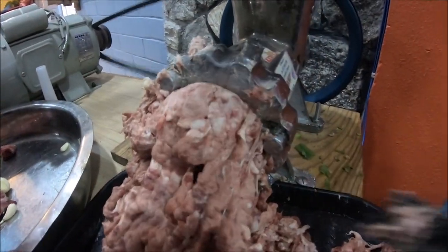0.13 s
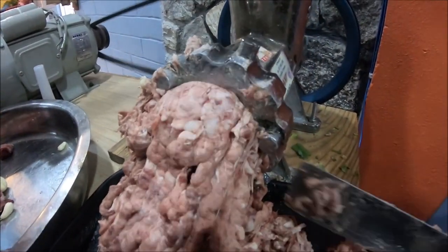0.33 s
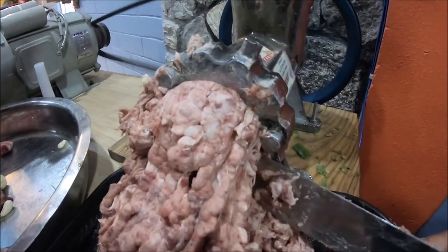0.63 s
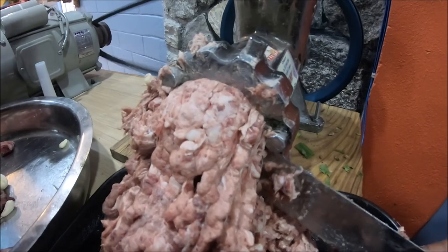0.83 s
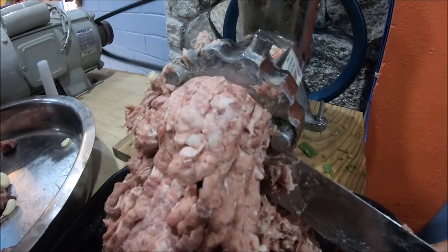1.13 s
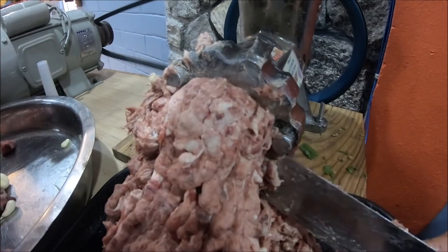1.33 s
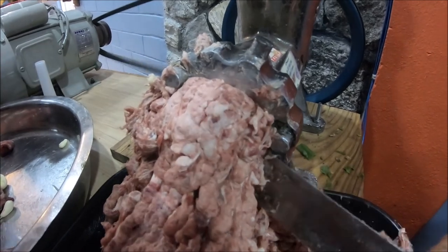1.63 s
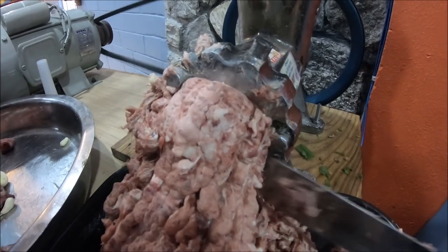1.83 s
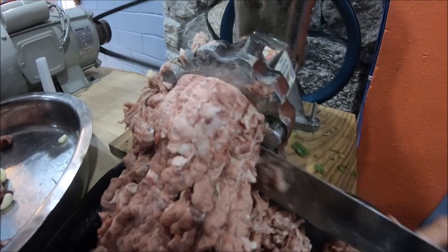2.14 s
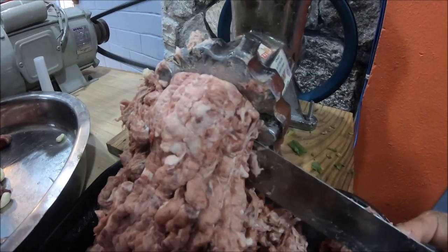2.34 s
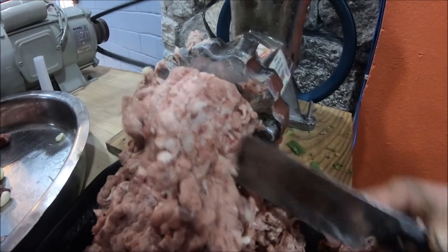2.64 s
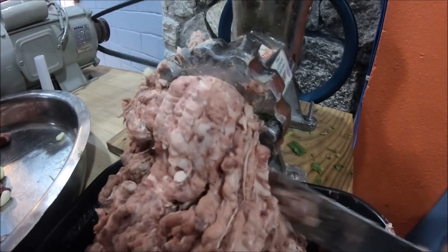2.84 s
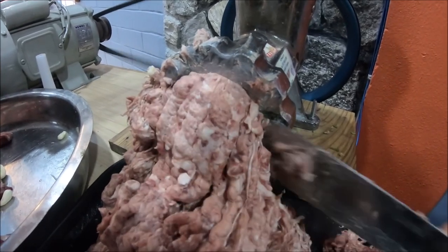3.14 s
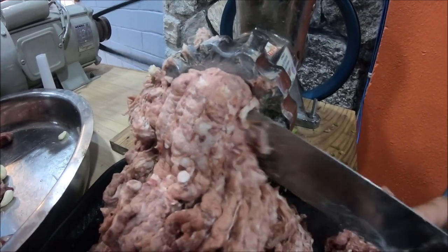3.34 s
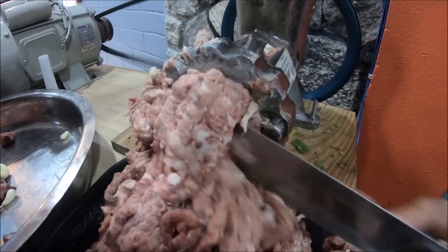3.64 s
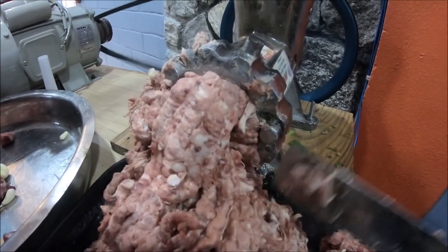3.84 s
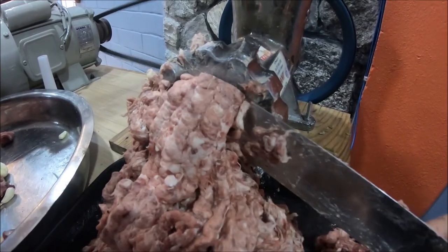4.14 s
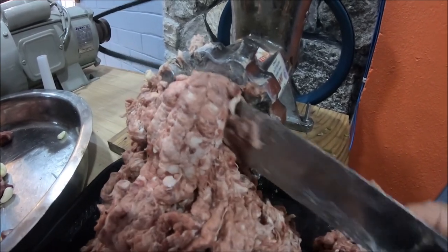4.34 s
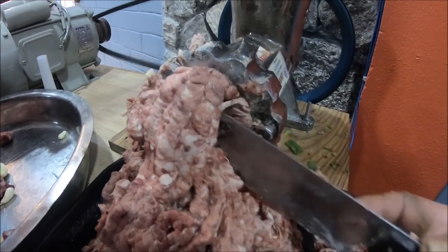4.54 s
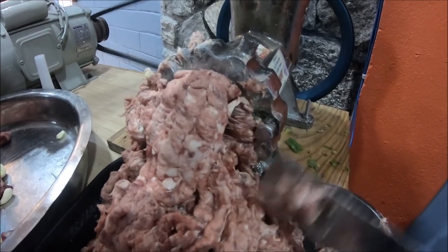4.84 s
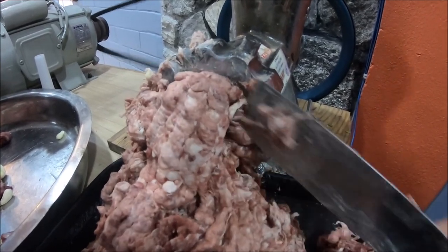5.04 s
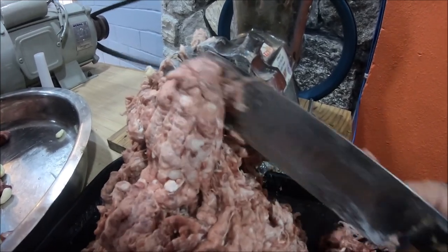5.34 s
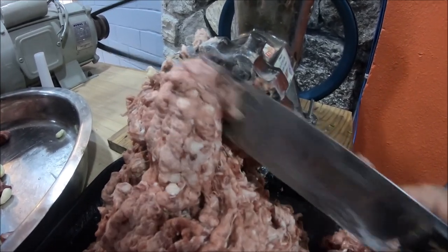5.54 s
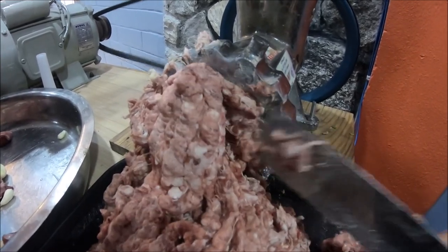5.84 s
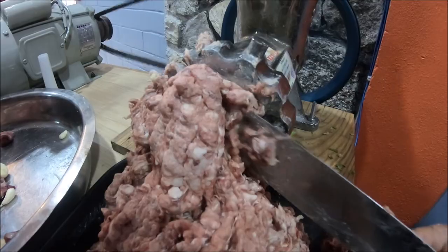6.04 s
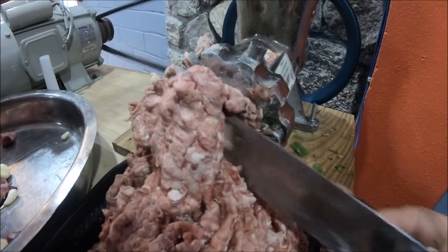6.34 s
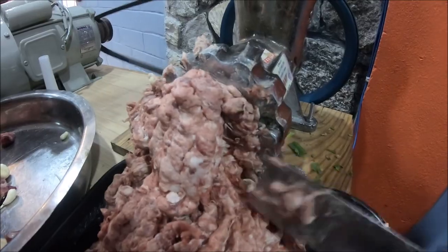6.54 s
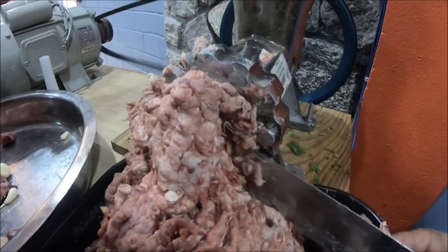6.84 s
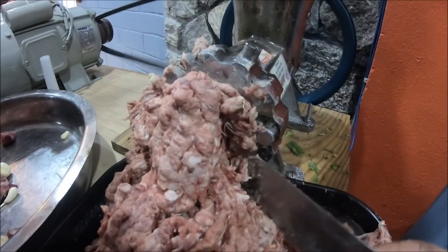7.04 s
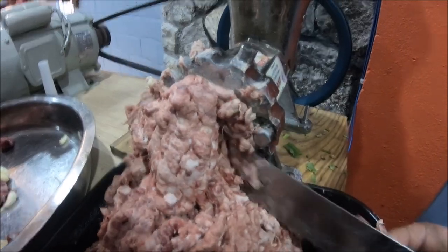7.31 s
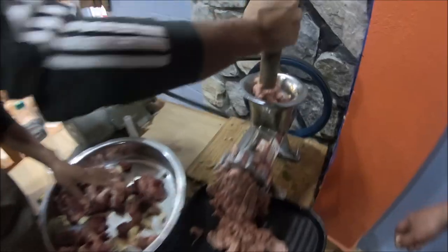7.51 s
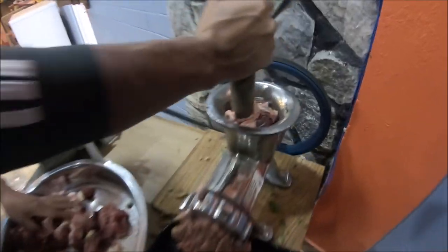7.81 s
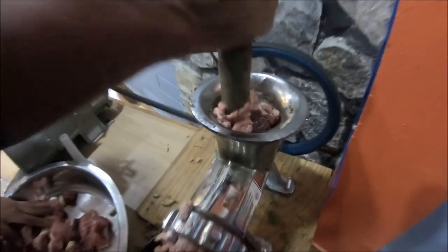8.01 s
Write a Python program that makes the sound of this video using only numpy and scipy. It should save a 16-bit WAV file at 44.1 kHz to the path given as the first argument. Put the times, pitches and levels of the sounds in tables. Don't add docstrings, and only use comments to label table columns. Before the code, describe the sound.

Close to two small microphones, a meat grinder runs on a wooden bench with a loud, throbbing low hum. Gritty gears clatter, the belt rubs in airy, squeaky puffs and thumps its cover about seven times a second. Meat knocks dully on a tray and a knife taps steel. Late on, a hand bumps the housing, the sound cuts out for an instant, and the machine resumes from slightly farther away.

```python
import sys
import numpy as np
from scipy import signal
from scipy.fft import rfft, irfft, next_fast_len
from scipy.io import wavfile
from scipy.ndimage import uniform_filter1d

SR = 44100
rng = np.random.default_rng(int(sys.argv[2]) if len(sys.argv) > 2 else 0)


def file_out(sig):
    cols = np.atleast_2d(sig).T
    lim = np.clip(cols, -1, 1)
    pcm = np.round(lim * 32767).astype(np.int16)
    wavfile.write(sys.argv[1], SR, pcm)


def volts(x):
    e = np.asarray(x, float) / 20
    return 10 ** e


N = 360297
T, PAD = np.arange(N) / SR, next_fast_len(N)
HZ = np.maximum(np.fft.rfftfreq(PAD, 1 / SR), 1)


def rms_one(x):
    return x / np.sqrt(np.mean(x ** 2) + 1e-20)


def along(rows, x, warp=np.asarray):
    first, *columns = np.transpose(rows)
    return [np.interp(warp(x), warp(first), column) for column in columns]


def drift(rate):
    r = np.exp(-80 * np.pi * rate / SR)
    noise = rng.standard_normal(N // 40 + 4002)
    slow = signal.lfilter([1], [1, -2 * r, r * r], noise)[4000:]
    return np.interp(T, np.arange(len(slow)) * 40 / SR, rms_one(slow))


def peaks(modes):
    power = 0
    for hz, width, db in modes:
        detune = 1 + (2 * (HZ - hz) / width) ** 2
        power = power + volts(2 * db) / (detune * np.sqrt(detune))
    return power


def shaken(power, grain_db=0.):
    grit = volts(grain_db * np.minimum(rng.exponential(1, N), 3.3)) if grain_db else 1
    noise = grit * rng.standard_normal((2, N))
    return rms_one(irfft(rfft(noise, PAD) * np.sqrt(power), PAD)[:, :N])


def evened(x, span_s):
    return rms_one(x / np.sqrt(.12 + uniform_filter1d(x ** 2, int(span_s * SR), axis=1)))


def patchy(x, edges, flicker_db, rate):
    spectrum, out = rfft(x, PAD), 0
    for low, high in zip(edges, edges[1:]):
        band = irfft(spectrum * ((HZ >= low) & (HZ < high)), PAD)[:, :N]
        out = out + volts(flicker_db * drift(rate)) * band
    return rms_one(out)


def swells(rows, idle_db):
    power = np.full(N, volts(2 * idle_db))
    for s, db, ms in rows:
        half = .00064 * max(ms, 16)
        near = slice(max(int((s - 3 * half) * SR), 0), int((s + 3 * half) * SR))
        power[near] += volts(2 * db) * np.exp(-((T[near] - s) / half) ** 2)
    return np.sqrt(power)


def tone(hz, level_db, waver):
    slow = waver * drift(1.76)
    level = np.sqrt(2) * volts(level_db) * (1 + 0.55 * slow)
    return level * np.cos(2 * np.pi * (hz * T + rng.random()) + slow[::-1])


# t/s, level/dB
MOTOR_LOAD = [(0.0, -16), (0.48, -17), (0.95, -16), (1.16, -16.5), (5.55, -14.5), (6.62, -14.5),
              (6.78, -17), (7.35, -18.5), (7.51, -16.5), (8.17, -15.5)]


def hum_level():
    return along(MOTOR_LOAD, T)[0]


HUM_HZ, LAP_HZ, SHAFT_HZ = 99.72, 7.31, 24.58
# distance/laps, level under the bench/dB
WOBBLE = [(-2, -3), (-1, -13), (2.5, -18), (5, -3.5), (5.5, -11), (3, -6), (10, -21)]
# multiple, level/dB
LAP_ORDERS = [(4, -57), (5, -64), (6, -48), (7, -39.5), (10, -41.5), (17, -34), (19, -56)]
# multiple, level/dB
SHAFT_ORDERS = [(1, -46.5), (2, -45.5), (3, -42.5), (7, -51.5)]
# f/Hz, level/dB
WHINE = [(199.45, -50), (299.2, -56), (423.6, -61), (498.6, -67), (668.2, -64), (689.1, -56), (789.0, -58),
         (888.6, -61), (1261.4, -68), (1298.7, -72)]


def motor(hum_db, bench_db):
    since = T - GAP_S[0]
    lap = 2 * np.pi * LAP_HZ * since + .4 * drift(1.0)
    warble = .26 * np.sin(lap) + .17 * np.sin(2 * lap)
    out = np.sqrt(2) * volts(hum_db) * np.cos(2 * np.pi * HUM_HZ * since + .1 + warble)
    out = out + volts(bench_db) * sum(tone(HUM_HZ + k * LAP_HZ, db, 0.61) for k, db in WOBBLE)
    out = out + sum(tone(k * LAP_HZ, db, 0.42) for k, db in LAP_ORDERS)
    out = out + sum(tone(k * SHAFT_HZ, db, 0.65) for k, db in SHAFT_ORDERS)
    out = out + sum(tone(hz, db + 2, .3) for hz, db in WHINE)
    return out * [[1], [0]]


# f/Hz, width/Hz, level/dB
BENCH_MODES = [(78, 15, 2.5), (101, 22, -7), (134, 19, 11.5), (124, 8.1, -5.5), (160, 16, -17.5),
               (206, 64, -11.5)]


def bench(bench_db):
    return volts(bench_db - 4.5) * evened(shaken(peaks(BENCH_MODES)), .05)


# f/Hz, width/Hz, level/dB
RUMBLE_MODES = [(48.7, 11, -3), (30, 10, -7.5)]


def rumble():
    level_db = -37.5 + 2 * drift(2.9)
    return volts(level_db - 6.5) * shaken(peaks(RUMBLE_MODES))


# f/Hz, level/dB per Hz
GEAR_COLOUR = [(220, -30.5), (380, 2.5), (476, -10), (686, -7.5), (1140, -13.5), (1280, -15), (1920, -24),
               (3190, -26), (4530, -35.5), (7740, -38), (11000, -57.5), (14300, -81), (22000, -120)]
# f/Hz, width/Hz, level/dB
CASING_MODES = [(675, 68, 7.3), (840, 120, 3.2), (1276.4, 23, 11.1), (1542, 32, 7.3), (1706, 89, 4.4),
                (2384, 130, 5.6), (2650, 90, 5.4), (3370, 840, 2.6)]


def gears(grip):
    colour = volts(2 * along(GEAR_COLOUR, HZ, np.log)[0]) * (1 + peaks(CASING_MODES))
    level = volts(-44.5 + 1.56 * drift(20)) * rms_one(1 + 0.078 * rms_one(grip))
    edges = [200, 950, 1420, 1900, 2400, 3000, 16000]
    return level * patchy(shaken(colour, grain_db=2.5), edges, flicker_db=1.6, rate=14.0)


JOINT_LAP_S, FIRST_JOINT_S, JOINT_AFTER_GAP_S = .1393, .035, 7.487


def joints():
    before = np.arange(FIRST_JOINT_S, GAP_S[0], JOINT_LAP_S)
    return np.r_[before, np.arange(JOINT_AFTER_GAP_S, N / SR, JOINT_LAP_S)]


def lap_beat(lag_s):
    since = T - lag_s - np.where(T < GAP_S[0], FIRST_JOINT_S, JOINT_AFTER_GAP_S)
    return np.cos(2 * np.pi * since / JOINT_LAP_S)


# t/s, rub level/dB, rub length/ms
GRIP = [(0.0, -49, 16), (0.25, -61.5, 35), (0.5, -52, 29), (0.75, -56, 24), (1.1, -52.5, 80),
        (1.6, -55.5, 35), (2.2, -57.5, 55), (2.6, -53.5, 34), (3.05, -57, 41), (3.35, -60.5, 35),
        (3.9, -52, 30), (4.7, -51.5, 37), (5.0, -57, 35), (5.85, -53.5, 37), (6.05, -54.5, 30),
        (6.56, -54.5, 45), (7.0, -63, 62), (7.5, -51, 38)]
# t/s, level/dB, length/ms
CATCHES = [(0.268, -56.5, 16), (0.656, -64, 18), (0.794, -54, 14), (0.83, -53.5, 8.1), (0.938, -58, 23),
           (1.779, -51, 16), (2.332, -57, 16), (2.637, -55.5, 81), (2.924, -54, 43), (3.049, -52.5, 31),
           (3.174, -61, 13), (3.76, -54, 25), (4.275, -57, 17), (4.697, -58.5, 34), (5.116, -61, 99),
           (5.366, -55, 30), (5.829, -51.5, 20), (6.68, -57, 32), (6.808, -59, 28), (6.864, -53.5, 34),
           (7.143, -52, 11), (7.211, -59.5, 30), (7.356, -58.5, 28), (7.716, -54, 16), (7.858, -57, 12),
           (1.699, -54, 45), (3.498, -54.5, 36), (4.497, -54, 39), (5.609, -52.5, 38), (6.425, -58.5, 37)]


def rubbing():
    s = joints()
    db, ms = along(GRIP, s)
    late, loud = rng.standard_normal((len(s), 2)).T
    puffs = zip(s + .005 * late, db + .8 * loud, ms)
    return swells([*puffs, *CATCHES], idle_db=-65)


# f/Hz, level/dB per Hz
RUB_COLOUR = [(900, -14), (1500, -1), (3000, 1), (4600, -2.5), (6300, 3), (8000, 0), (10000, -8.5),
              (11500, -21.5), (14500, -25.5), (15500, -46.5)]
# f/Hz, width/Hz, level/dB
BELT_MODES = [(6080, 160, 4.6), (6700, 84, 2.9), (7820, 330, 1.8), (9800, 67, 1.3), (2600, 520, 0.76)]


def belt(grip):
    colour = volts(2 * along(RUB_COLOUR, HZ, np.log)[0]) * (1 + peaks(BELT_MODES))
    edges = [600, 2000, 3600, 5300, 6300, 7200, 8400, 9800, 16000]
    flutter_db = 1.1 * drift(80)
    friction = patchy(shaken(colour, grain_db=4.5), edges, flicker_db=3.0, rate=54.0)
    return volts(1.5 + flutter_db) * grip * friction


THUMP_LAG_S = .02
# t/s, level change/dB
ODD_THUMPS = [(0.04, -14), (0.18, -12), (0.33, -10), (0.89, -11.5), (1.02, 3.5), (1.17, -9), (1.46, -5.5),
              (1.58, -6.5), (2.3, -7.5), (3.26, -6), (3.53, 3.5), (3.67, -7.5), (3.96, 0), (4.1, -5),
              (4.37, 4), (4.64, -6.5), (5.06, -4.5), (5.35, -2), (5.47, -10.5), (5.75, -6), (6.03, -0.5),
              (6.31, -4.5), (6.72, -10.5), (7.02, -2.5), (7.3, -8.5), (7.43, -5.5), (7.77, 0.5),
              (8.05, -3.5)]


def thumps():
    s = joints() + THUMP_LAG_S
    late, loud = rng.standard_normal((len(s), 2)).T
    db = -31.5 + 1.15 * loud
    for when, change_db in ODD_THUMPS:
        db[np.argmin(abs(s - when))] += change_db
    return np.c_[s + .004 * late, db]


def booms():
    blows = thumps()
    out, chance = np.zeros((2, N)), rng.random((len(blows), 2))
    for (s, db), (pitch, start) in zip(blows, chance):
        near = slice(max(int((s - .06) * SR), 0), int((s + .1) * SR))
        age = T[near] - s
        swell = np.exp(-(age / np.where(age < 0, .018, .028)) ** 2)
        hz = 334 + 24 * pitch ** 1.5
        out[0, near] += volts(db + 1.0) * swell * np.cos(2 * np.pi * (hz * age + start))
    return out


# f/Hz, width/Hz, level/dB
COVER_MODES = [(329.8, 14, -1.5), (352.7, 21, 2), (407, 10, -10.5), (310, 10, -6)]


def cover():
    return volts(-41.0 + 1.3 * lap_beat(THUMP_LAG_S)) * shaken(peaks(COVER_MODES)) + booms()


# t/s, level/dB, length/ms
HEAVES = [(0.3, -35, 250), (0.82, -32.5, 120), (1.02, -36.5, 27), (1.16, -33.5, 50), (1.42, -30, 220),
          (1.95, -32.5, 190), (2.18, -33.5, 100), (2.55, -38, 390), (3.1, -28.5, 110), (3.65, -31, 130),
          (3.97, -34, 140), (4.6, -38.5, 1100), (5.26, -35.5, 78), (5.75, -34, 290), (6.3, -31.5, 150),
          (6.53, -41, 20), (6.85, -35, 300), (7.57, -29.5, 200), (7.85, -34, 740)]
# f/Hz, width/Hz, level/dB
STAND_MODES = [(257.95, 9.5, 0.5), (286.4, 4.3, -7.5)]


def stand():
    throb = volts(2.5 * lap_beat(lag_s=0.03))
    return swells(HEAVES, idle_db=-43.0) * throb * evened(shaken(peaks(STAND_MODES)), 0.038)


def struck(events, body, ring_s):
    rattle, rings = np.zeros(N), np.zeros((2, N))
    for s, db, ring_hz, ring_db, ms in events:
        near = slice(int(s * SR), min(int((s + 0.054) * SR), N))
        age = T[near] - s
        dying = np.exp(-age / (.0008 * ms)) + .07 * np.exp(-age / .025)
        rattle[near] += volts(db) * np.minimum(age / .0007, 1) * dying
        ring = np.exp(-age / (ring_s * ms / 7)) * np.sin(2 * np.pi * ring_hz * age)
        rings[0, near] += volts(db + ring_db) * np.minimum(age / .002, 1) * ring
    return rattle * evened(shaken(peaks(body), grain_db=-6.5), 0.0044) + rings


# t/s, peak level/dB, ring f/Hz, ring level/dB, rattle/ms
KNOCKS = [(0.219, -24, 750, -1, 2.9), (0.261, -32.5, 907, -5.5, 4.8), (0.709, -34.5, 474, -3, 6.2),
          (2.692, -41, 509, -8.5, 4.2), (3.75, -34.5, 694, 2, 6.3), (5.303, -30, 674, -1.5, 4.5),
          (5.702, -24.5, 732, -5.5, 8.5), (5.708, -33, 340, 14.5, 16), (6.168, -28.5, 583, -8, 6.2),
          (6.507, -32, 670, -4.5, 5.1), (6.982, -29.5, 1840, -9, 3), (7.008, -31, 534, -8, 4),
          (7.75, -36, 695, 3.5, 5.6), (7.909, -24.5, 795, 2.5, 2), (8.136, -34, 670, -8.5, 5)]
# f/Hz, width/Hz, level/dB
TRAY_MODES = [(330, 410, 2), (560, 270, 2.5), (800, 36, 9.5), (1050, 150, 7), (1590, 550, -6.5),
              (2280, 850, -15)]


def tray():
    return volts(-5.5) * struck(KNOCKS, TRAY_MODES, ring_s=0.026)


# t/s, peak level/dB, ring f/Hz, ring level/dB, rattle/ms
TAPS = [
    (1.602, -32, 2830, 1.5, 1.8),
    (1.698, -44.5, 3040, 8, 5),
    (5.7543, -44, 2600, 2, 7.8),
    (5.8028, -18.5, 2740, -11.5, 5),
    (5.875, -49.5, 5200, -7, 3.2),
    (6.642, -23, 3500, -6.5, 7.8),
    (6.7062, -31.5, 3100, -0.5, 5.3),
    (6.7174, -37.5, 3390, -10, 4.9),
    (6.9815, -38.5, 3420, 3.5, 2),
]
# f/Hz, width/Hz, level/dB
BLADE_MODES = [(2740, 150, -3), (3440, 78, -4), (4080, 240, -15.5), (5630, 260, -2.5), (6860, 260, 2),
               (7940, 410, 3), (9500, 1600, -3.5), (11100, 2200, -23.5), (6040, 5100, -10.5)]


def knife():
    sides = volts(np.array([[-2.3], [2.3]]))
    out = ports(volts(-5) * struck(TAPS, BLADE_MODES, ring_s=.011)) * sides
    out[0] = np.roll(out[0], 3)
    return out


# t/s, level/dB, half length/s
HAND_PUSH = (7.31, -25, .06)


def handling():
    s, db, seconds = HAND_PUSH
    push = np.exp(-((T - s) / seconds) ** 2)
    return volts(db) * push * shaken(peaks([(32, 30, -2.5), (70, 15, -4.5)]))


# f/Hz, likeness 0-1, left lead/rad, left minus right level/dB
PORTS = [(30, 0.6, 0.028, 0), (59.6, 1, 0, -1.83), (170, 1, 0.42, -1.3), (335, 0.97, 0.14, 0),
         (420, 0.5, 0.76, 2.7), (523, .82, 1.45, -4), (740, 0.78, 1.7, -4.5), (980, 1, 1.9, 2.5),
         (1300, .8, 1.35, 0.5), (2000, 1, 1.4, 3.5), (2470, 0.8, 2.6, 0), (3260, 0.7, 0, 2),
         (4300, 0.5, 0.061, -0.3), (6000, 0.2, 0.11, 0.5), (8000, 0.8, 0.33, -0.5), (12000, 0.7, 0, 1.5)]


def ports(sound):
    alike, lead, balance_db = along(PORTS, HZ, np.log)
    alike = np.clip(alike, 0, 1)
    direct, diffuse = rfft(sound, PAD)
    right = alike * direct * np.exp(-1j * lead) + np.sqrt(1 - alike ** 2) * diffuse
    even = np.sqrt(2 / (1 + alike * np.cos(lead)))
    both = np.array([direct * volts(balance_db / 2), right * volts(-balance_db / 2)])
    return irfft(even * both, PAD)[:, :N]


def scene():
    hum_db = hum_level()
    bench_db = -26.5 - 0.9 * (hum_db - hum_db.mean()) - 3.0 * (T > GAP_S[0])
    grip = rubbing()
    machine = motor(hum_db, bench_db) + bench(bench_db) + rumble() + gears(grip)
    machine = machine + belt(grip) + cover() + stand()
    return ports(machine + tray()) + knife() + handling()


def gain_control(dry):
    power = uniform_filter1d(np.mean(dry ** 2, axis=0), int(.02 * SR))
    return dry * (.3 + .7 * power / np.mean(power)) ** -.28


# start t/s, end t/s
GAP_S = (7.4337, 7.466)
# t/s, level/dB
GAP_TICK = (7.4385, -34)


def scene_change(wet):
    cut, back = int(GAP_S[0] * SR), int(GAP_S[1] * SR)
    wet[:, :cut] += (.23 - wet[:, [cut]]) * np.exp((T[:cut] - GAP_S[0]) / .003)
    wet[:, back:] -= wet[:, [back]] * np.exp((GAP_S[1] - T[back:]) / .002)
    dull = signal.butter(4, 2600, fs=SR, output="sos")
    residue = signal.sosfilt(dull, rng.standard_normal(back - cut))
    wet[:, cut:back] = volts(-40 - 350 * (T[cut:back] - GAP_S[0])) * residue
    tick = volts(GAP_TICK[1]) * np.exp(-((T - GAP_TICK[0]) / .0004) ** 2)
    return wet + tick * np.diff(rng.standard_normal(N + 1))


def band_limit(x):
    return signal.sosfilt(signal.butter(12, 15500, fs=SR, output="sos"), x)


def record(dry):
    wet = scene_change(gain_control(dry))
    wet = signal.sosfilt(signal.butter(6, 14500, fs=SR, output="sos"), wet)
    return band_limit(wet)


dry = scene()
out = record(dry)
file_out(out)
```